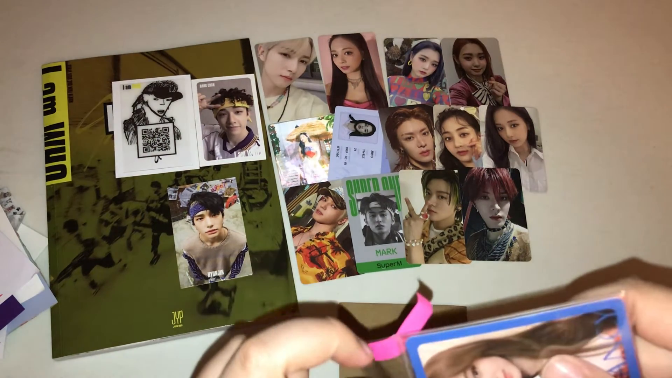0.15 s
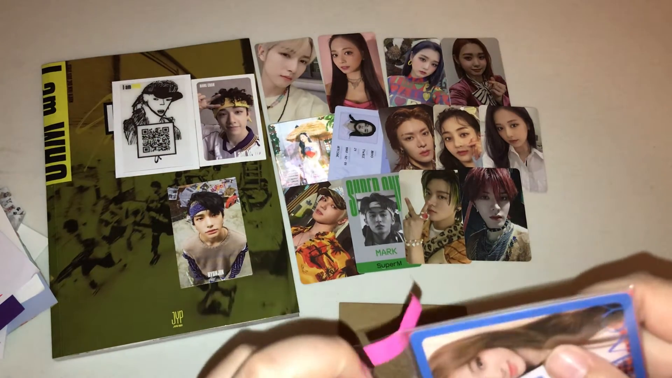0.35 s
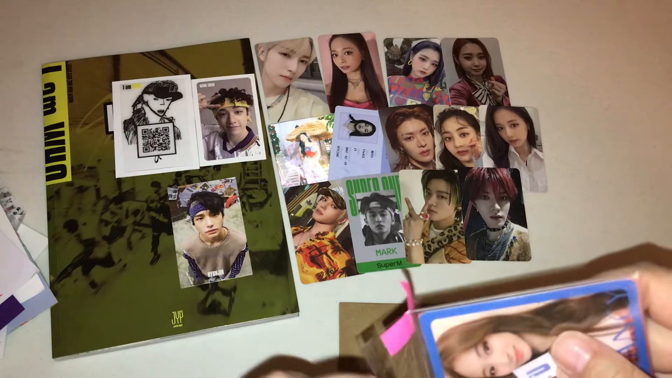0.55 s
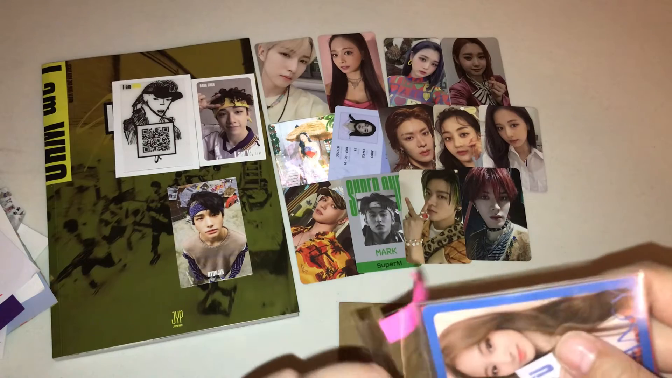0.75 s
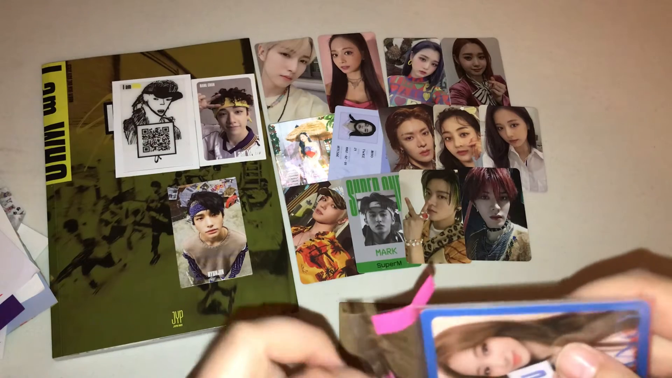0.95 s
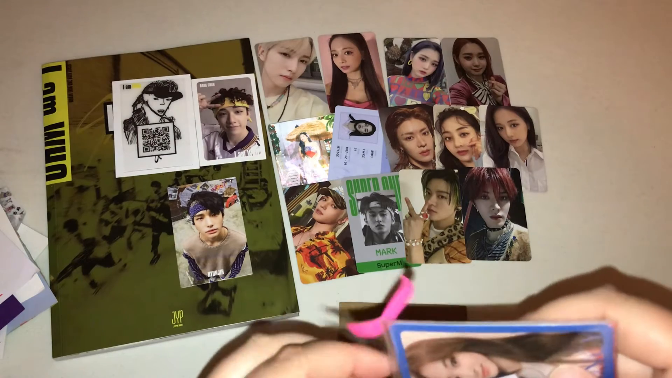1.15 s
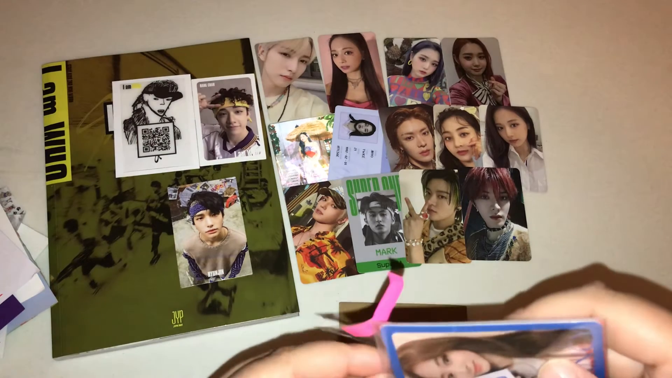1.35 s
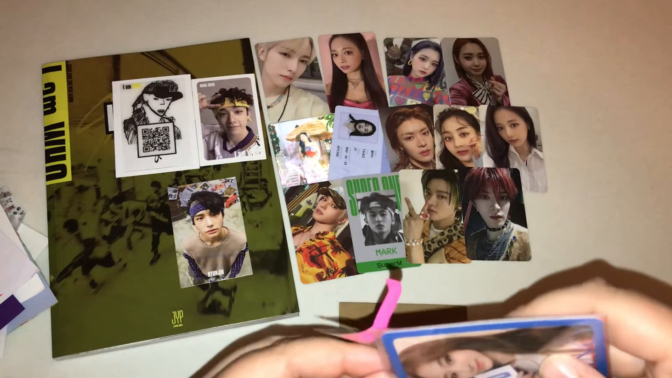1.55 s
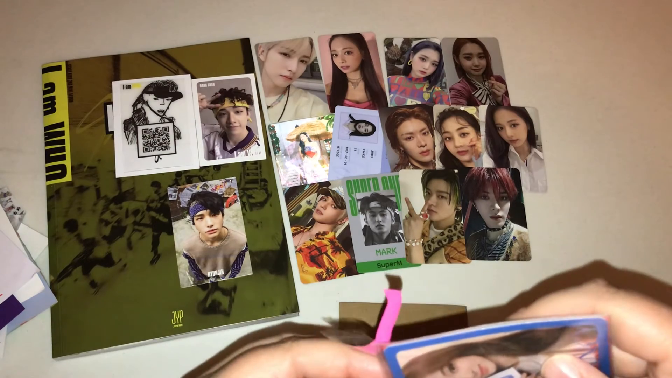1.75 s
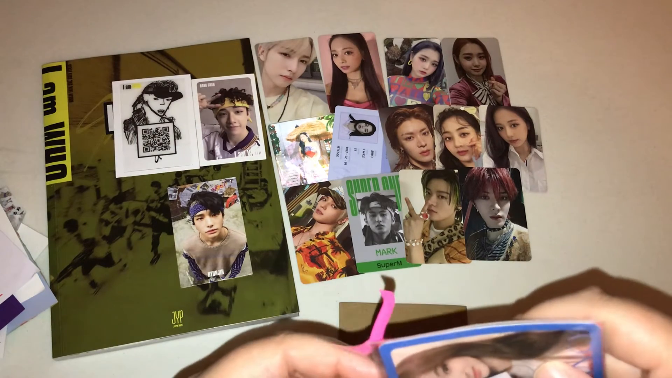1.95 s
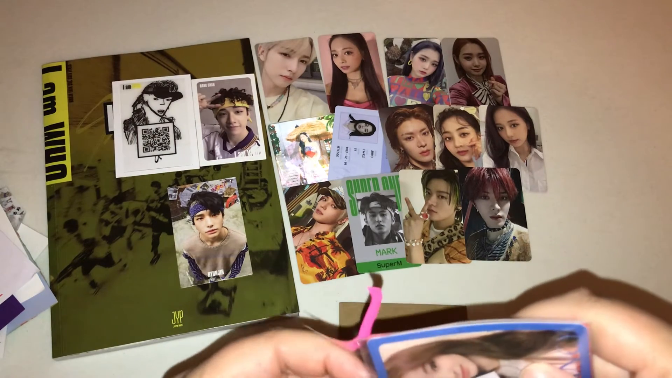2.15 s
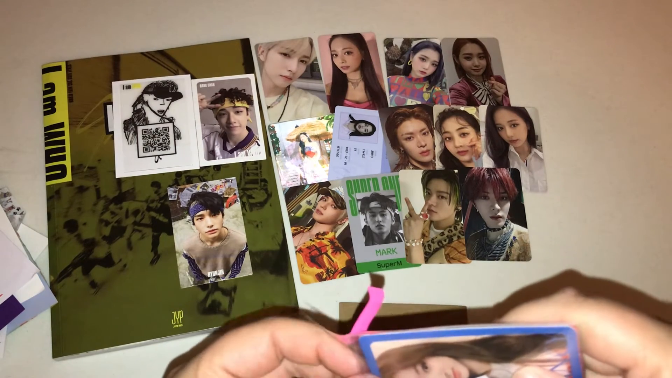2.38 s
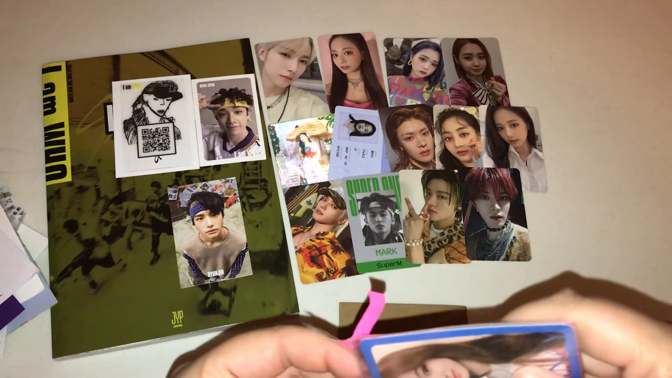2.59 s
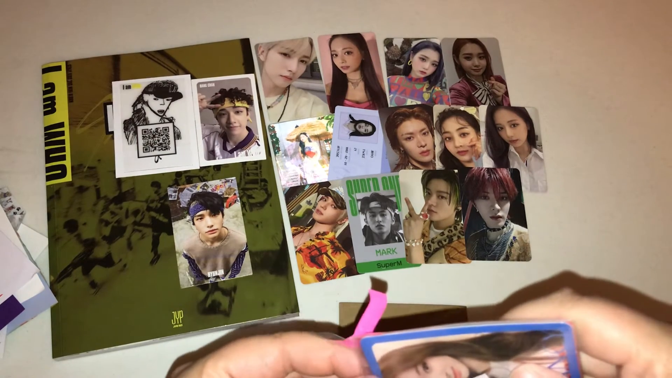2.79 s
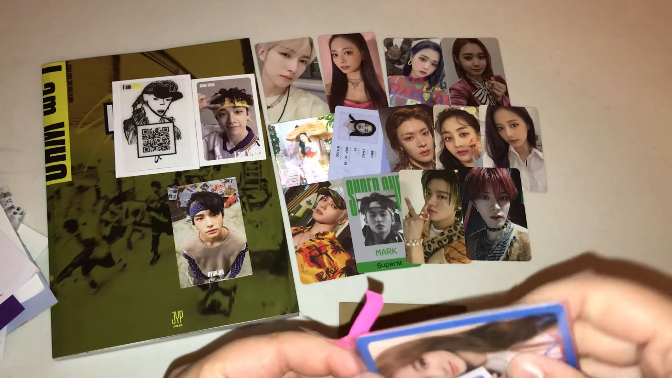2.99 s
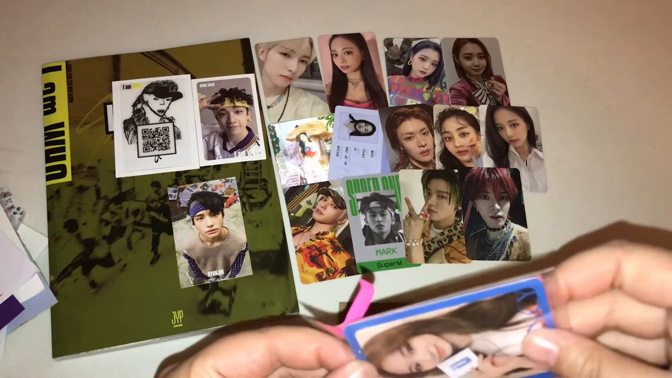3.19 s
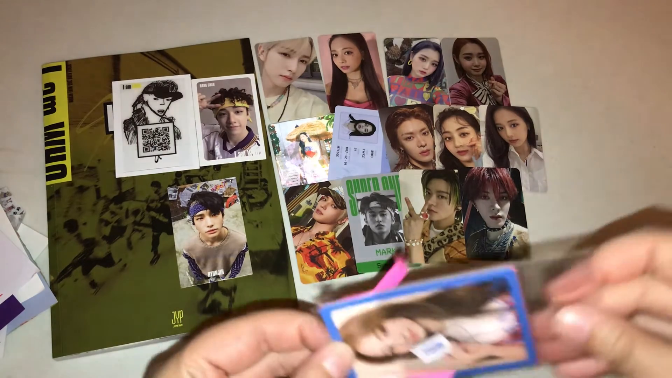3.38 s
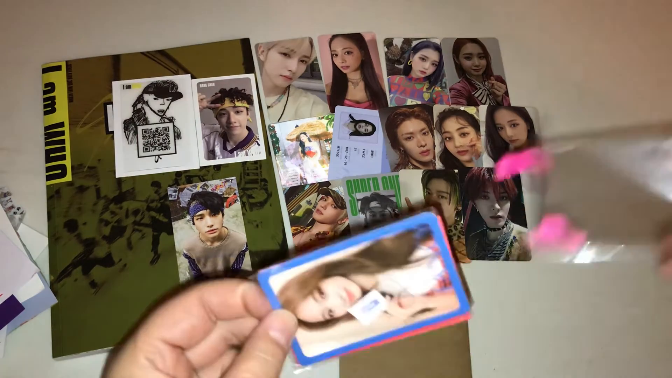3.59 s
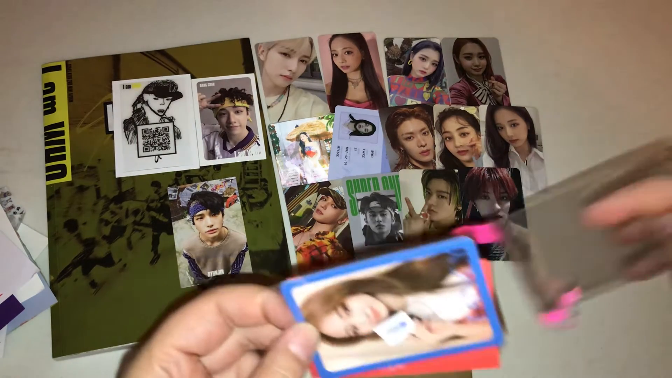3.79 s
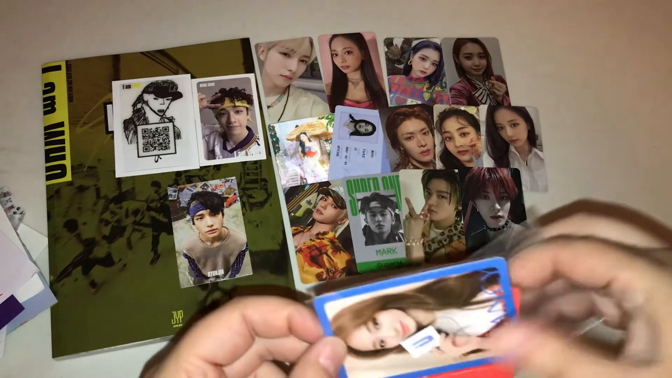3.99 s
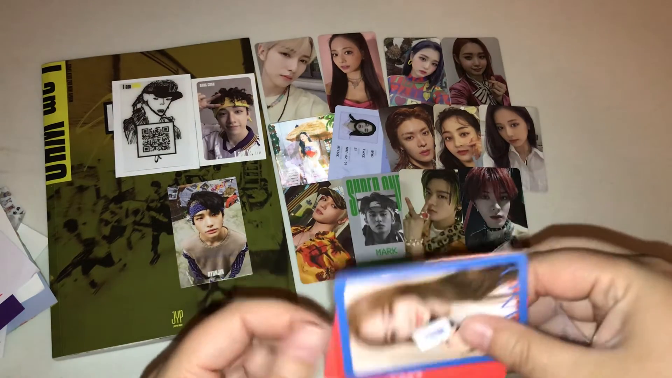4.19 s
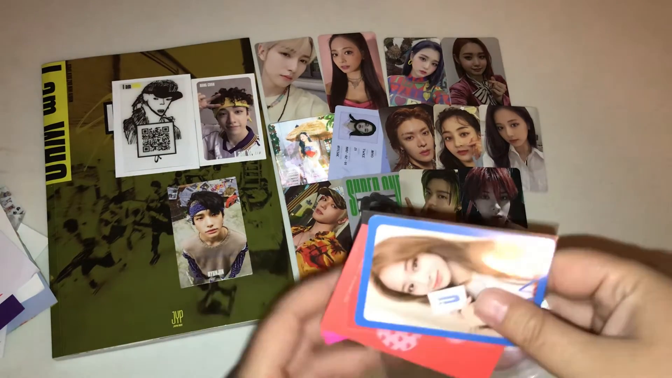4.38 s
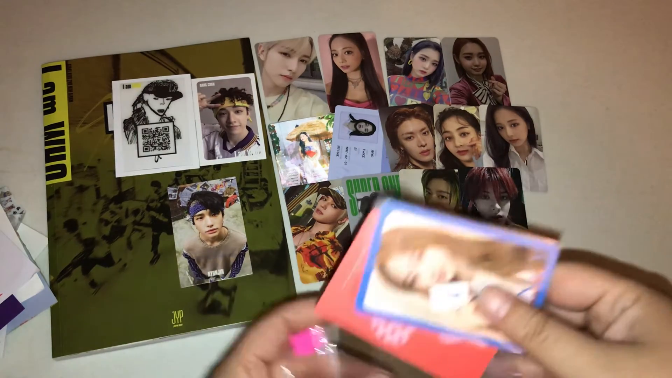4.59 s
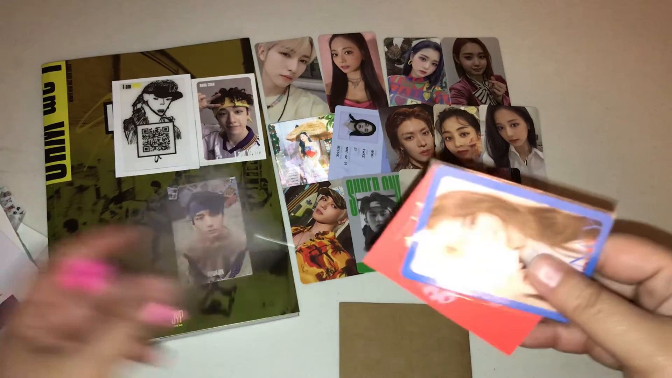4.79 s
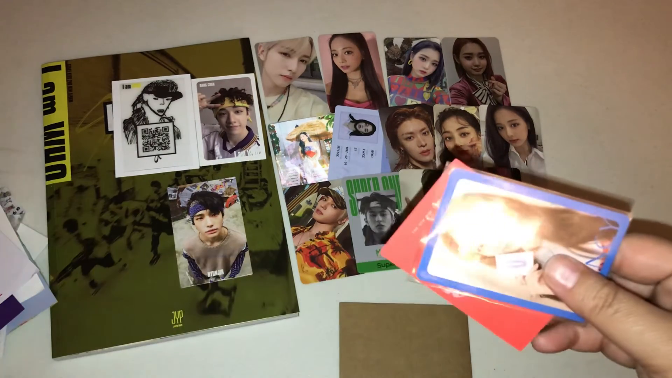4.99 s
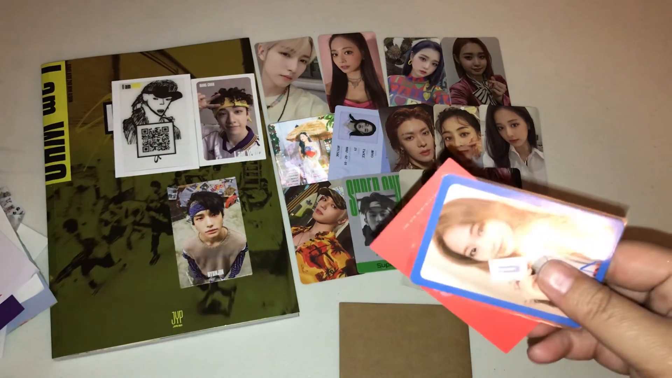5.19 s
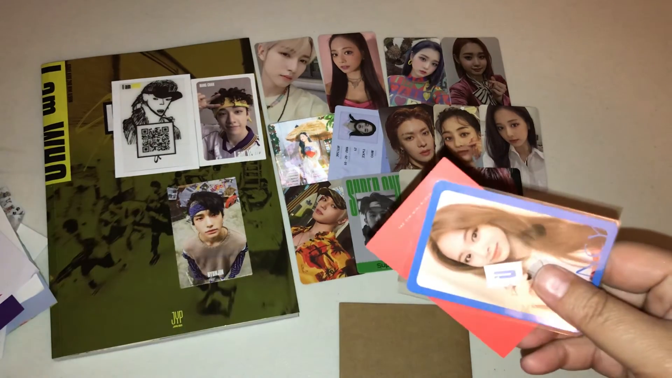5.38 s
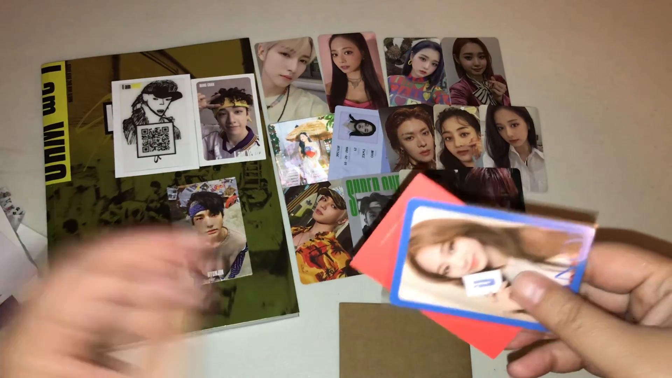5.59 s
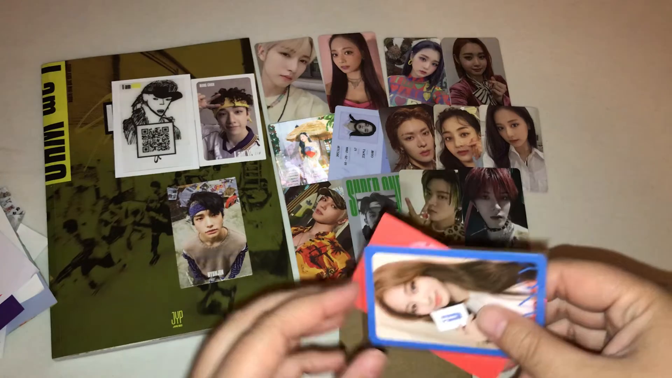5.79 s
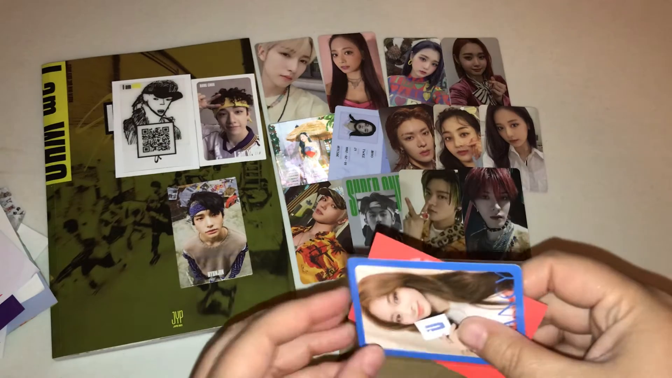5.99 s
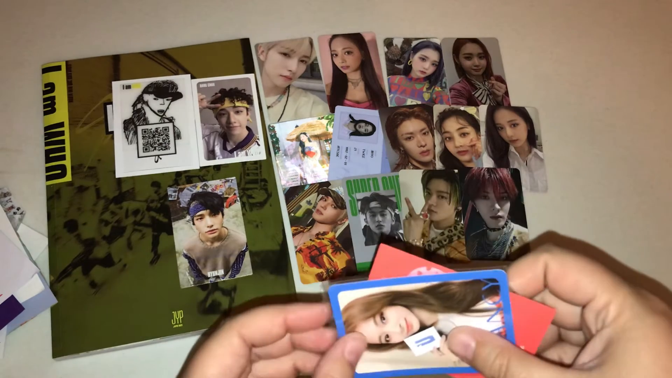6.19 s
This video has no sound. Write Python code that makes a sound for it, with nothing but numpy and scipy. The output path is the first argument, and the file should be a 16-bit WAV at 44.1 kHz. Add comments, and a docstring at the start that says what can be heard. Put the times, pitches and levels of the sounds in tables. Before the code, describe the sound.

In a quiet room with a steady low hum and hiss, a thin plastic sleeve is handled near the microphone. Irregular crackles and light finger scrapes come first as its tape is picked open. After a sparse stretch, the film slides off the cards with a denser, crisp rustle, while a very faint low tone sinks in the background. Short, light crinkles trail off toward the end.

```python
"""Thin plastic card sleeve: hands peel tape from it and slide it off, near a phone above a table.
Creases snap in short bursts; each snap has one pitched ring, from a low thud to a high ping.
Sliding, bending film rustles in dense tiny ticks; fingers scrape lower.
Recurring peaks, probably table and phone reflections, colour snaps and rustle.
Table and walls echo the snaps. Behind: a quiet room's hum, hiss and one falling low tone."""
import sys
import numpy as np
from scipy import signal
from scipy.fft import rfft, irfft
from scipy.io import wavfile
from scipy.ndimage import uniform_filter1d

SR = 44100
rng = np.random.default_rng(int(sys.argv[2]) if len(sys.argv) > 2 else 0)


def dump_mix(stems):
    """Bounce the given channels to the path in sys.argv[1] as a 16-bit WAV at rate SR."""
    frames = np.atleast_2d(stems).T  # one column per channel
    limited = np.clip(frames, -1, 1)  # hard clip at full scale
    pcm = np.round(limited * 32767).astype(np.int16)
    wavfile.write(sys.argv[1], SR, pcm)


N = 275625

# Bands: mid < 5.2 kHz < treble < 10.5 kHz < top.
# Crease snaps: (time [s], crack level over 6 ms [dB], ring re crack [dB], ring pitch [Hz],
# treble re mid [dB], top re treble [dB])
CREASE_SNAPS = [(0.0085, -53.0, -2, 850.0, 2, -10), (0.0345, -56.5, 4, 880.0, -12, -9),
                (0.0663, -50.0, -2, 1470.0, -6, -6), (0.0722, -39.5, -12, 3000, 0, 4),
                (0.1102, -54, 2, 2000, -12, -16), (0.2306, -46, -1, 4500, -3, -9),
                (0.247, -48, -20, 2150, 8, 3), (0.3292, -58.5, -2, 850.0, -13, -12),
                (0.3557, -41.0, -10, 1330.0, 1, -4), (0.4041, -41, -4, 4400, -6, 3),
                (0.417, -38.5, -18, 1130.0, 1, -6), (0.4205, -37.5, -10, 700, -4, 8),
                (0.4308, -36.5, -10, 850.0, 1, -7), (0.453, -39.0, -31, 1300.0, 1, -1),
                (0.491, -44.5, -9, 700, 8, -13), (0.5051, -39.5, -7, 1350.0, 5, 1),
                (0.629, -54.0, -5, 1150.0, -20, -18), (0.6985, -44, -7, 650, -2, -3),
                (0.7455, -30.5, -11, 620, 3, -1), (0.7919, -34.0, -9, 270, 6, 2),
                (0.7965, -47.0, -2, 330, -2, 1), (0.8014, -45.5, -2, 590.0, -3, -13),
                (0.8375, -48.0, -11, 1290.0, 5, -4), (1.0575, -26.5, -17, 750, 3, 0),
                (1.1032, -56.5, 4, 1430.0, -7, -3), (1.1645, -44, -1, 4500, -5, -12),
                (1.1695, -51.5, 0, 1410.0, -6, -2), (1.3523, -45, 0, 4400, -8, -3),
                (1.382, -55.0, -4, 980.0, 2, -6), (1.4374, -49.0, -4, 1470.0, -1, 1),
                (1.479, -60.5, 2, 1540.0, -14, -2), (1.7595, -49.5, -26, 740.0, -3, 3),
                (1.803, -47, -5, 4400, -2, 4), (1.8594, -50, -3, 6300, 1, -12),
                (1.9509, -58.0, -6, 670.0, 0, -9), (2.101, -50, -3, 5800, -9, -16),
                (2.1333, -49.0, -15, 580.0, -4, 11), (2.209, -47, -3, 3000, -11, -2),
                (2.2266, -40.5, -11, 1300, -1, -7), (2.28, -58.0, -21, 1200.0, 2, -14),
                (2.3654, -56.5, -27, 730.0, -6, -5), (2.3935, -52.5, 1, 360, -8, -2),
                (2.7767, -36, -3, 8900, 0, -4), (2.7783, -38, -3, 1450, -10, -10),
                (2.8958, -60.0, -4, 1000.0, -10, -27), (3.0024, -63.0, -7, 880.0, -19, -9),
                (3.0382, -58.5, -25, 1040.0, -5, -14), (3.1525, -52.5, -20, 1320.0, -5, -5),
                (3.1569, -51, 0, 3200, -15, -2), (3.1747, -46, -2, 6000, 0, -5),
                (3.1904, -44, -8, 2100, 3, -11), (3.221, -55, 0, 4250, -13, -27),
                (3.2309, -37.5, -14, 1290.0, -1, 6), (3.2421, -45, -5, 3250, -4, -12),
                (3.2618, -37.5, -11, 1410.0, -1, -1), (3.2653, -45, -2, 6200, 6, -8),
                (3.3464, -38.0, -13, 560, 5, -10), (3.3848, -47.5, -10, 690.0, 7, -10),
                (3.4299, -32, 0, 12300, 5, -3), (3.4322, -40, -3, 4600, -6, -2),
                (3.444, -50.0, -16, 1240.0, -6, -6), (3.5286, -51.5, -22, 1040.0, 10, -3),
                (3.5593, -49, -4, 3900, -7, -6), (3.5756, -50.5, 1, 960.0, -5, -4),
                (3.5996, -52.0, -3, 1390.0, -4, 4), (3.8037, -58.5, 4, 1130.0, -2, -18),
                (4.008, -46.5, -14, 1340.0, -7, -9), (4.0426, -55.5, -24, 740.0, -7, -13),
                (4.1194, -48, -3, 13000, 3, 0), (4.127, -49, -8, 2150, 0, 0),
                (4.2124, -51.5, -7, 730.0, 5, 1), (4.4525, -55, -8, 2150, 4, -2),
                (4.5037, -48.0, -3, 750, 3, -4), (4.5172, -49.0, -6, 700, -3, -4),
                (4.585, -62.5, -8, 1080.0, -12, 0), (4.7874, -58.5, -7, 830.0, -8, -5),
                (5.1051, -53.0, -8, 1400.0, 1, 8), (5.1839, -56.5, -22, 720.0, 0, -7),
                (5.2776, -47.5, -18, 1510.0, -5, 4), (6.0502, -56.0, -23, 900.0, -1, 10),
                (6.076, -52.0, -4, 1320.0, -4, -10)]
# Snap roll-off: (frequency [Hz], gain [dB])
SNAP_ROLLOFF = [(15600, 0), (16800, -20)]
# Recurring peaks in snaps and rustle, probably table and phone reflections: (frequency [Hz], gain [dB])
REFLECTION_PEAKS = [(1400, -11), (2150, -7), (3050, -4), (3800, -2), (4400, -1.5), (6100, -2.5), (7200, -5),
                    (8800, -2.5), (12400, -2.5), (14900, -3)]
# Film sliding or bending: (peak time [s], gain [dB], 20 dB swell [s], 20 dB fade [s],
# scrape gain [dB], treble re mid [dB], pitch [Hz])
FILM_STROKES = [(0.07, -55, .08, .14, -3, -2, 2600), (0.24, -45, .065, .04, -14, 1, 4500),
                (0.29, -66, .1, .3, 0, -4, 2600), (0.417, -51, .025, .06, -2, 0, 4400),
                (0.55, -64.5, .1, .2, -2, -2, 6100), (0.646, -57, .07, .07, -4, -5, 6700),
                (0.796, -47, .02, .02, -1, -9, 4400), (0.848, -49, .035, .13, -13, 1, 13000),
                (0.995, -54, .16, .2, -13, 2, 12700), (1.1, -68, .1, .2, 0, 0, 2150),
                (1.439, -58, .04, .1, -12, -5, 5800), (2.055, -64.5, .1, .3, -8, -8, 4300),
                (2.79, -61, .02, .14, -12, -2, 8600), (3.118, -68, .4, .2, -9, 0, 3800),
                (3.255, -56.5, .25, .2, -10, -1, 4400), (3.425, -45.5, .19, .05, -17, 1, 7200),
                (3.55, -50.5, .1, .08, -6, 1, 8800), (3.74, -60, .12, .13, -14, 0, 11800),
                (4.075, -53, .05, .08, -20, -3, 5800), (4.118, -41, .025, .02, -19, 1, 12700),
                (4.135, -52, .015, .05, -17, -2, 3800), (4.175, -57, .06, .08, -19, 3, 7500),
                (4.4, -55, .03, .07, -20, -5, 3500), (4.457, -50.5, .015, .09, -18, -1, 8800),
                (4.508, -45.5, .05, .04, -12, -1, 6100), (4.75, -67, .08, .1, -6, -7, 5800),
                (4.856, -62, .2, .22, -6, -7, 5800), (5.04, -64, .1, .1, -8, 6, 8800),
                (5.103, -58.5, .07, .055, -7, 6, 3200), (5.185, -62, .12, .1, -10, 5, 9200),
                (5.28, -66, .15, .08, -4, 3, 12400), (5.965, -64, .05, .1, -8, -5, 3800),
                (6.051, -59, .05, .055, -16, 2, 12400)]
# Film between strokes: (gain [dB], scrape gain [dB], treble re mid [dB], pitch [Hz])
FILM_AT_REST = (-78, 3, 4, 6500)
# Finger scrape spectrum: (frequency [Hz], gain [dB])
FINGER_SCRAPE = [(150, -9), (400, 1.5), (1000, 0), (1800, -4), (3000, -29)]
# Rustle and echo roll-off: (frequency [Hz], gain [dB])
SOFT_ROLLOFF = [(5000, -1.5), (15600, -5.5), (16000, -38)]
# Wall echo: (T60 [s], gain [dB])
ECHO_TAILS = [(.25, -11)]
# Room rumble and hiss: (frequency [Hz], gain [dB])
ROOM_SPECTRUM = [(15, -40), (30, -14.5), (70, -3), (100, -9.5), (121, -6.5), (160, -15.5), (200, -19.5),
                 (300, -23.5), (600, -32), (1000, -32), (1900, -39.5), (3000, -41.5), (6500, -47.5),
                 (7700, -56), (9000, -47), (10500, -55), (12000, -45), (15600, -42), (16000, -90)]
# Appliance tones: (frequency [Hz], level [dB], waver [Hz], waver [dB])
APPLIANCE_TONES = [(119.1, -65.5, 2.93, 3), (1854.5, -88, 0.4, 1)]
# Falling low tone, maybe a far engine: (time [s], frequency [Hz], level [dB])
FALLING_TONE = [(2.9, 52.1, -85), (3.4, 45.8, -68), (3.8, 38.3, -55.5), (4.2, 34, -59.5), (4.7, 31, -69),
                (5.0, 30, -99)]


def crease_snaps(click_db=7, table_ms=4.0, table_db=-19, decay_scatter_db=1.8, peak_scatter_db=1.6):
    """A crease creaks, then flips: a click, a burst smeared by the table top, one pitched ring."""
    times_s, crack_db, ring_db, ring_hz, treble_db, top_db = columns(CREASE_SNAPS)
    size, lead = 1024, 64  # samples
    t_ms = (np.arange(size) - lead) * 1000 / SR
    after_ms = np.maximum(t_ms, 0)
    noise = rng.standard_normal((len(times_s), 2, size))
    stretch = undb(decay_scatter_db * noise[:, 0, :1])
    fast = np.exp(-after_ms / np.clip(0.195 * stretch, .1, 5))
    slow = 0.13 * np.exp(-after_ms / np.clip(1.5 * stretch, .3, 8))
    smear = undb(table_db) * np.exp(-after_ms / table_ms)
    creak = 0.25 * np.exp(t_ms / 0.7)
    burst = noise[:, 0] * np.where(t_ms < 0, creak, fast + slow + smear)
    burst[:, lead] = undb(click_db)
    crack = reflection_peaks(burst, treble_db, top_db,
                             lambda hz: peak_scatter_db * rng.standard_normal(times_s.shape))
    ring = snap_ring(noise[:, 1], after_ms, ring_hz)
    snaps = level(crack, crack_db, count=256) + level(ring, crack_db + ring_db, count=256)
    out = np.zeros(N + size)
    for time_s, snap in zip(times_s[:, 0], colour(snaps, SNAP_ROLLOFF)):
        start = int(time_s * SR) - lead
        out[start:start + size] += snap
    return out[:N]


def snap_ring(noise, after_ms, hz, q_at_4khz=3.2):
    """A snap's pitched ring, from a low, broad thud to a short, high ping."""
    drive = noise * after_ms * np.exp(-after_ms * np.sqrt(hz) / 15)
    q = q_at_4khz * (hz / 4000) ** .9
    return resonate(resonate(drive, hz, q), hz, q)


def rustle(ticks_per_s=500, tick_ms=0.83, scatter_db=5.0, lift_db=6, lift_octaves=.25):
    """Tiny creases tick over the hiss of sliding film; fingers scrape lower."""
    gain_db, scrape_db, treble_db, log2_pitch = strokes()
    sizes = undb(scatter_db * np.minimum(rng.exponential(size=N), 2))
    impulses = (rng.random(N) < ticks_per_s / SR) * sizes
    pole = np.exp(-1000 / tick_ms / SR)
    ticks = signal.lfilter([1], [1, -pole], impulses) * rng.standard_normal(N)
    hiss = rng.standard_normal(N)
    grain = (level(ticks, 0.8) + level(hiss, 4.6)) * undb(2.2 * walk(60))

    def extra_db(hz):
        """Peaks near the stroke's pitch rise; each flickers."""
        nearness = np.exp(-((np.log2(hz) - log2_pitch) / lift_octaves) ** 2)
        return lift_db * nearness + 2.2 * walk(14) + 2.6 * walk(70)

    sheet = reflection_peaks(grain, treble_db, top_db=-2.5, extra_db=extra_db)
    scrape = undb(scrape_db) * level(colour(grain, FINGER_SCRAPE), 0)
    return colour(undb(gain_db) * (sheet + scrape), SOFT_ROLLOFF)


def strokes():
    """Strokes swell and fade linearly in dB; their colours mix by power."""
    peak_s, peak_db, swell_s, fade_s, scrape_db, treble_db, pitch_hz = columns(FILM_STROKES)
    rest_db, rest_scrape_db, rest_treble_db, rest_hz = FILM_AT_REST
    t = np.arange(0, N, 32) / SR
    drop_db = 20 * np.maximum((peak_s - t) / swell_s, (t - peak_s) / fade_s)
    power = undb(peak_db - drop_db) ** 2
    rest_power = undb(rest_db) ** 2
    total = rest_power + power.sum(0)
    controls = [10 * np.log10(total)]
    for moving, resting in ((scrape_db, rest_scrape_db), (treble_db, rest_treble_db),
                            (np.log2(pitch_hz), np.log2(rest_hz))):
        controls.append((rest_power * resting + (power * moving).sum(0)) / total)
    return [np.interp(np.arange(N) / SR, t, control) for control in controls]


def reflection_peaks(drive, treble_db, top_db, extra_db, q=5.5):
    """Comb of peaks, alternating in polarity, power-normalised. extra_db(hz) adds gain per peak."""
    out, power = 0, 0
    for k, (hz, db) in enumerate(REFLECTION_PEAKS):
        gain = undb(db + treble_db * (hz > 5200) + top_db * (hz > 10500) + extra_db(hz))
        out += (-1) ** k * gain * resonate(drive, hz, q)
        power += gain ** 2 * hz / q * np.pi / SR
    return out / np.sqrt(power)


def wall_echo(direct):
    """Direct sound plus a duller, diffuse tail off the walls."""
    t = np.arange(SR // 2) / SR
    tail = 0
    for t60_s, db in ECHO_TAILS:
        decay_per_s = np.log(1000) / t60_s
        envelope = np.exp(-decay_per_s * t) * np.sqrt(2 * decay_per_s / SR)  # unit energy
        tail += undb(db) * rng.standard_normal(len(t)) * envelope
    return direct + colour(signal.fftconvolve(direct, tail)[:N], SOFT_ROLLOFF)


def room_tone(noise_db=-56):
    """Rumble and hiss under wavering appliance tones."""
    out = level(colour(rng.standard_normal(N), ROOM_SPECTRUM), noise_db)
    for hz, db, waver_hz, waver_db in APPLIANCE_TONES:
        out += sine(db + waver_db * walk(5), hz + waver_hz * walk(6))
    return out


def falling_tone():
    """A low tone swells and fades as it slides down; maybe a far engine."""
    times_s, hz, db = np.transpose(FALLING_TONE)
    t = np.arange(N) / SR
    return sine(np.interp(t, times_s, db), np.interp(t, times_s, hz))


def undb(db):
    return 10 ** (np.asarray(db) / 20)


def columns(table):
    return np.transpose(table)[:, :, None]


def sine(rms_db, hz):
    return np.sqrt(2) * undb(rms_db) * np.sin(2 * np.pi * np.cumsum(hz) / SR)


def level(x, rms_db, count=None):
    """Set rms, over the first count samples if given."""
    return x * undb(rms_db) / np.sqrt(np.mean(x[..., :count] ** 2, axis=-1, keepdims=True))


def colour(x, points):
    """Filter by (frequency [Hz], gain [dB]) points."""
    hz, db = np.transpose(points)
    bins_hz = np.fft.rfftfreq(x.shape[-1], 1 / SR) + 1
    gain = undb(np.interp(np.log(bins_hz), np.log(hz), db))
    return irfft(rfft(x) * gain, x.shape[-1])


def resonate(x, hz, q):
    """One resonance, unity gain at centre."""
    bins_hz = np.fft.rfftfreq(x.shape[-1], 1 / SR) + 1
    return irfft(rfft(x) / (1 + 1j * q * (bins_hz / hz - hz / bins_hz)), x.shape[-1])


def walk(rate_hz):
    """Random steps, smoothed twice; spread near 1."""
    hold = int(SR / rate_hz)
    steps = np.repeat(rng.standard_normal(N // hold + 1), hold)
    return 1.3 * uniform_filter1d(uniform_filter1d(steps, hold), hold)[:N]


def scene():
    return (wall_echo(crease_snaps()) + rustle() + room_tone() + falling_tone())[None]


def record(dry):
    """Phone low-pass."""
    cutoff_hz = 16900
    return signal.sosfilt(signal.ellip(8, .2, 70, cutoff_hz, fs=SR, output="sos"), dry)


dry = scene()
out = record(dry)
dump_mix(out)
```